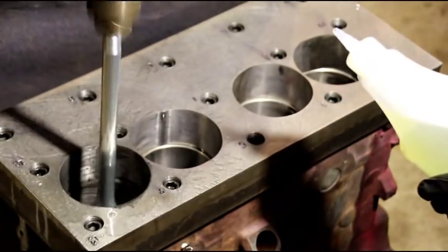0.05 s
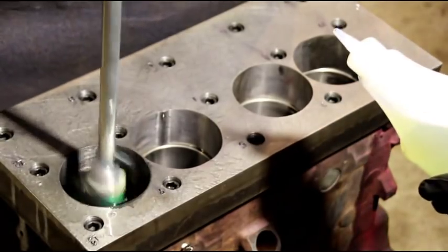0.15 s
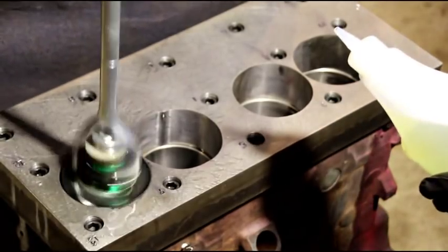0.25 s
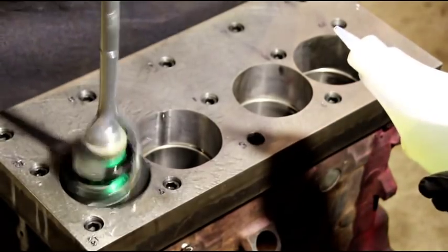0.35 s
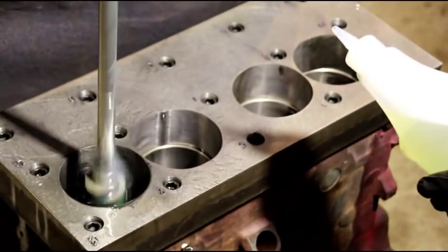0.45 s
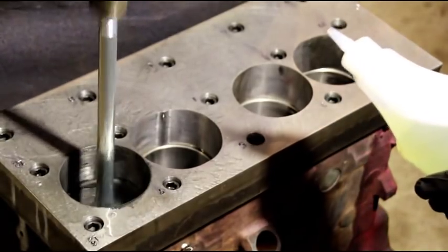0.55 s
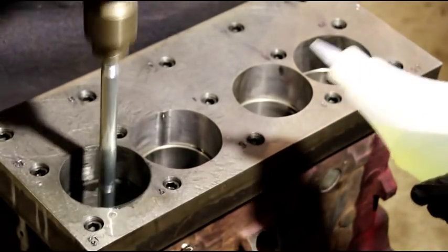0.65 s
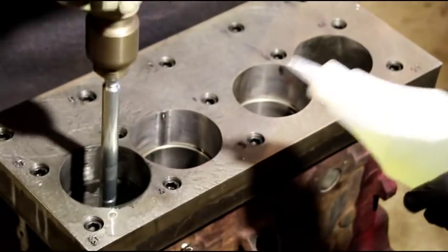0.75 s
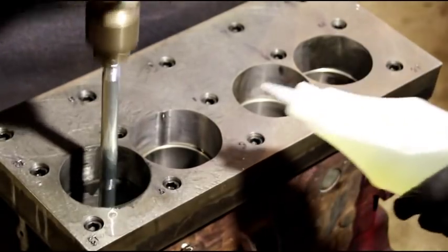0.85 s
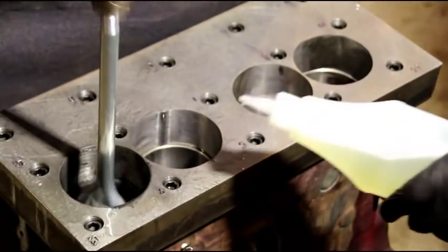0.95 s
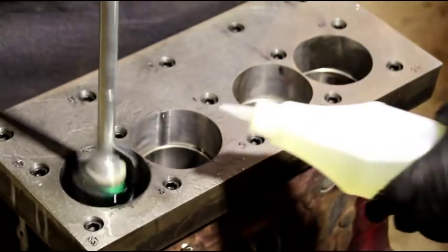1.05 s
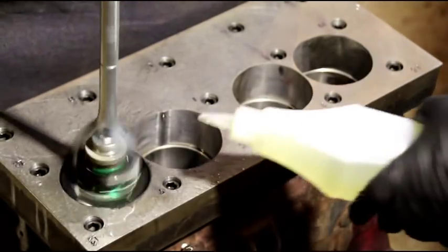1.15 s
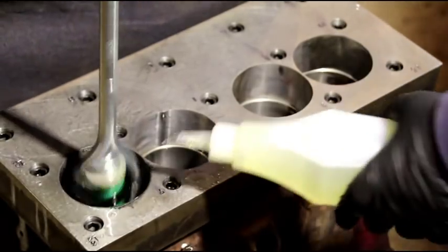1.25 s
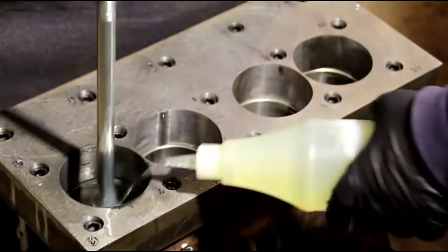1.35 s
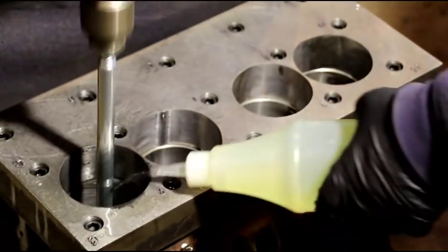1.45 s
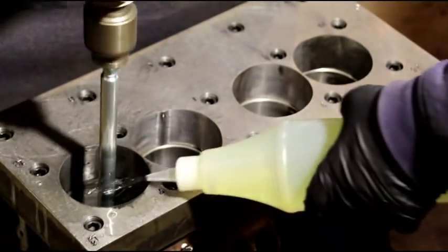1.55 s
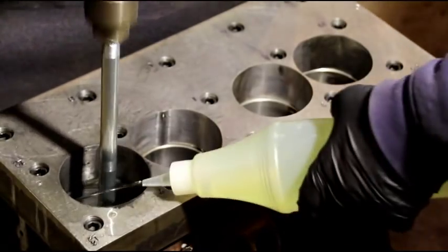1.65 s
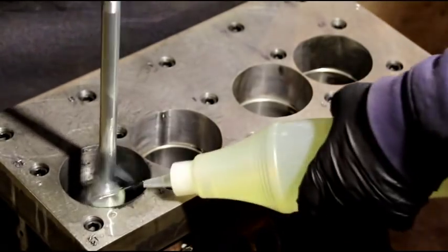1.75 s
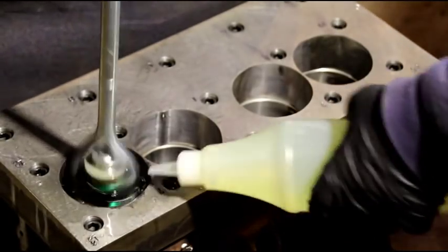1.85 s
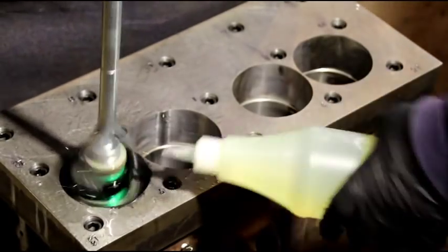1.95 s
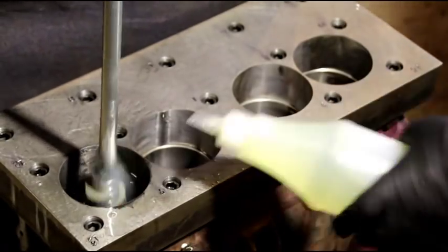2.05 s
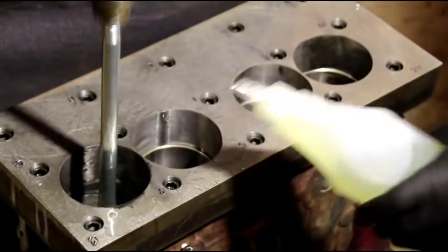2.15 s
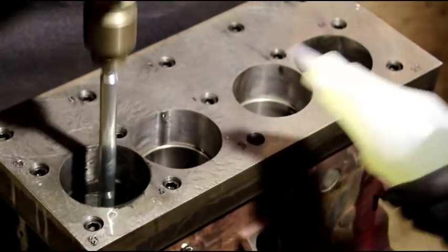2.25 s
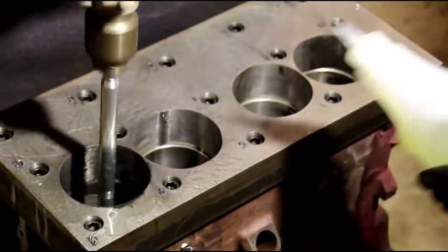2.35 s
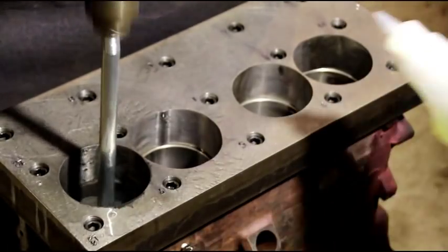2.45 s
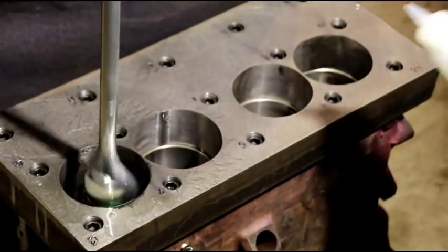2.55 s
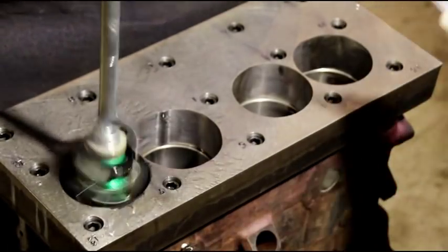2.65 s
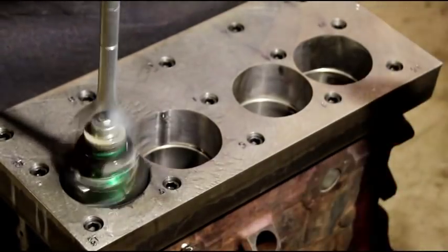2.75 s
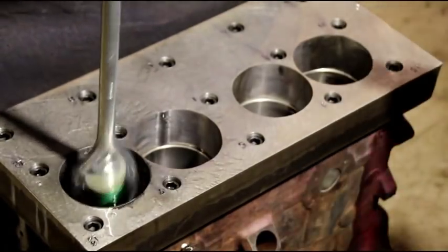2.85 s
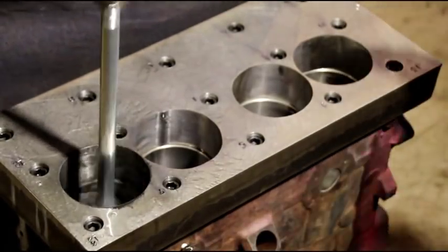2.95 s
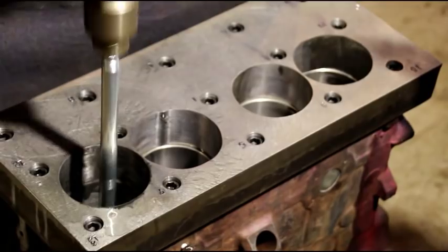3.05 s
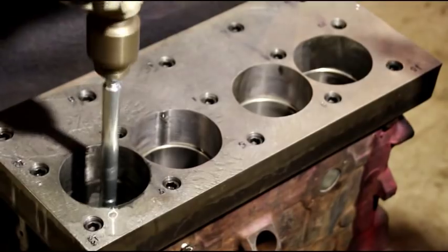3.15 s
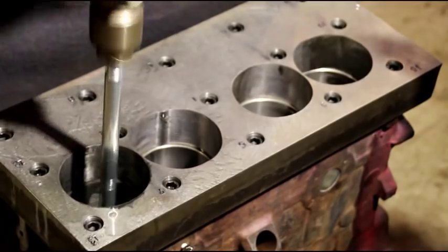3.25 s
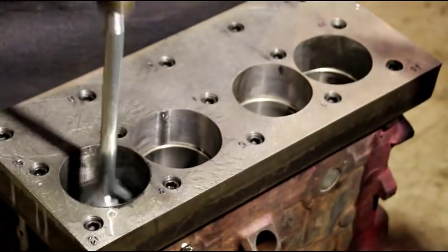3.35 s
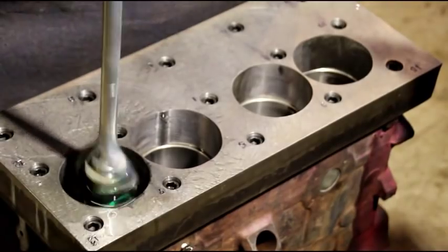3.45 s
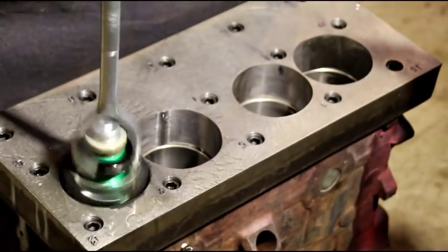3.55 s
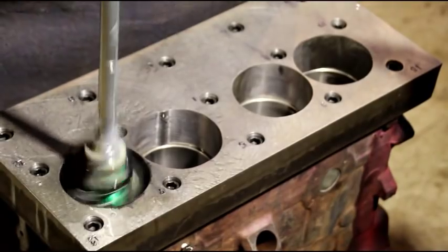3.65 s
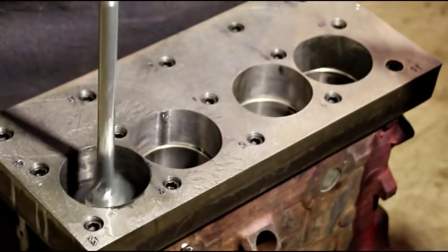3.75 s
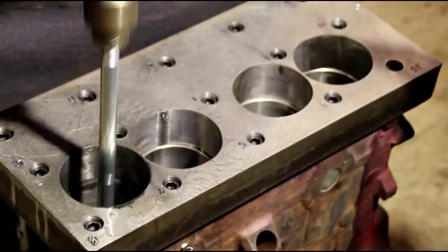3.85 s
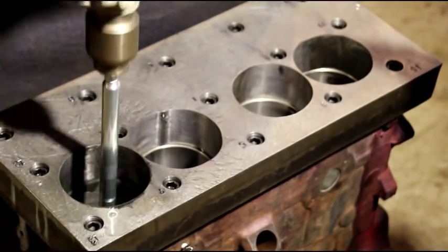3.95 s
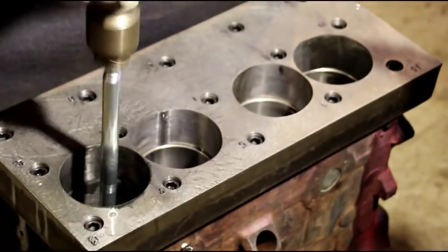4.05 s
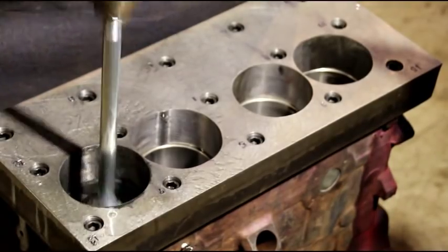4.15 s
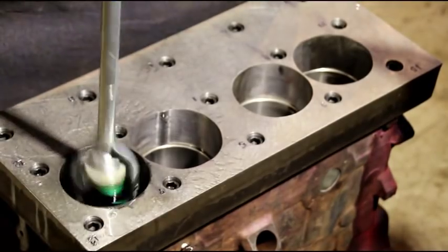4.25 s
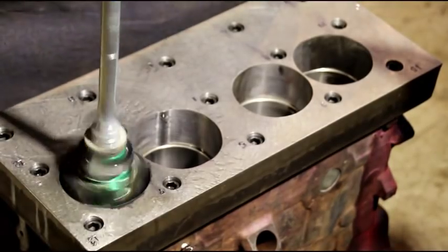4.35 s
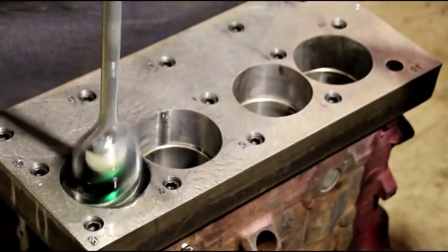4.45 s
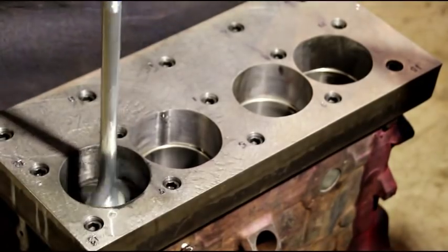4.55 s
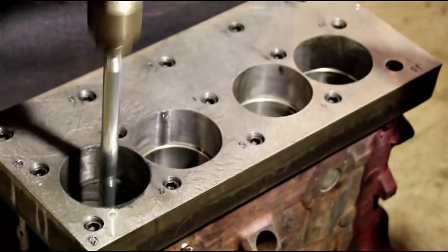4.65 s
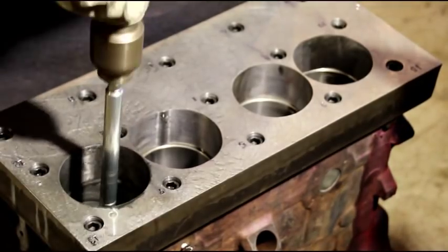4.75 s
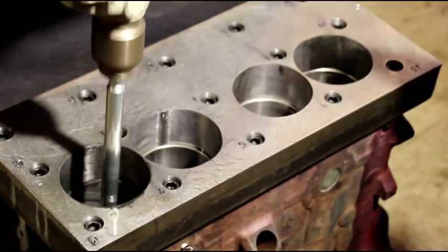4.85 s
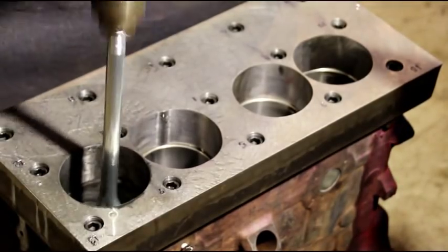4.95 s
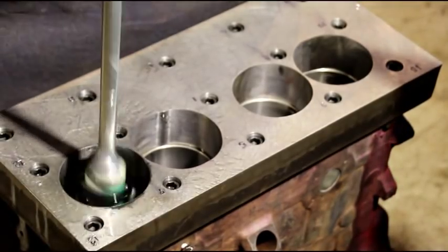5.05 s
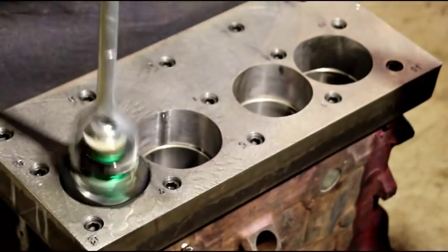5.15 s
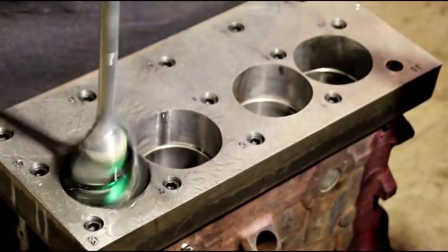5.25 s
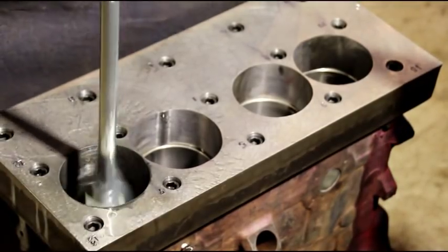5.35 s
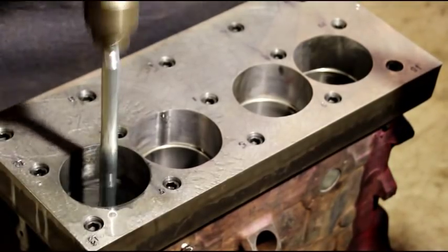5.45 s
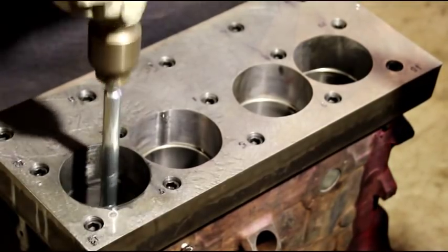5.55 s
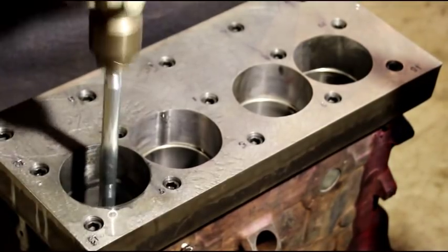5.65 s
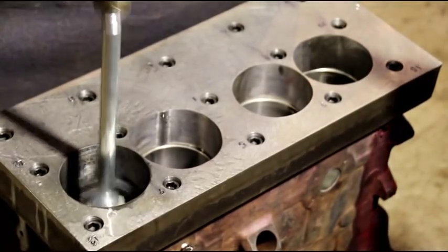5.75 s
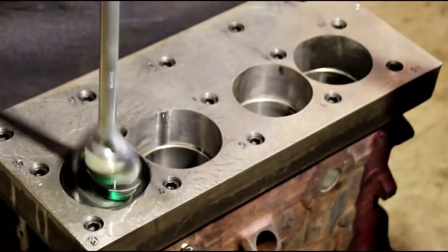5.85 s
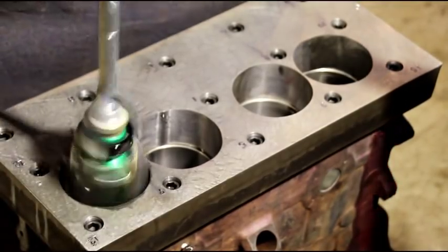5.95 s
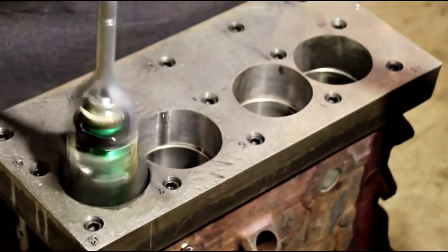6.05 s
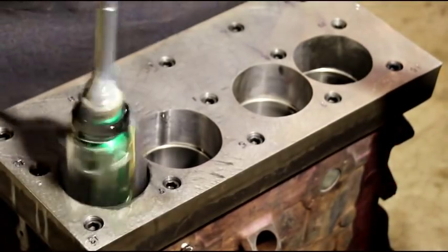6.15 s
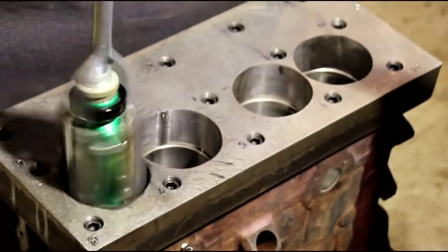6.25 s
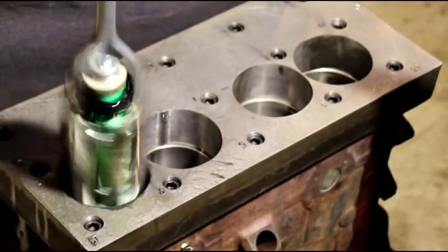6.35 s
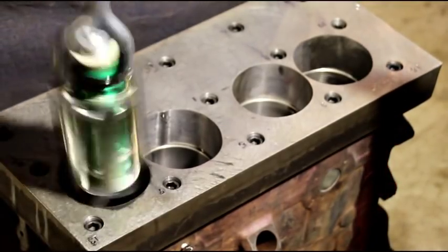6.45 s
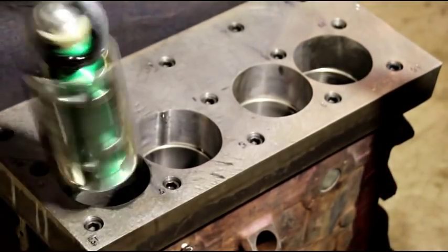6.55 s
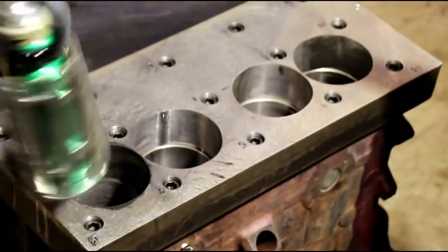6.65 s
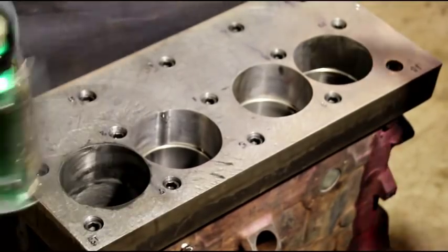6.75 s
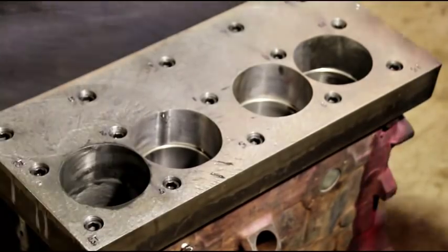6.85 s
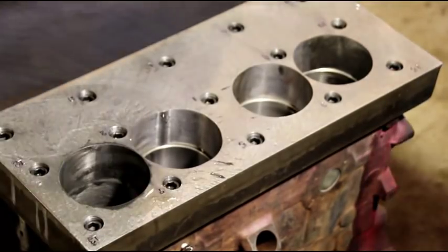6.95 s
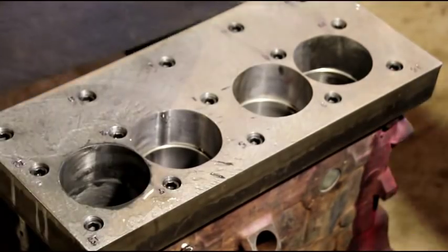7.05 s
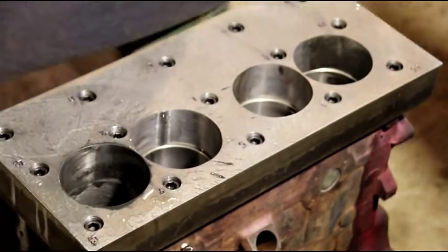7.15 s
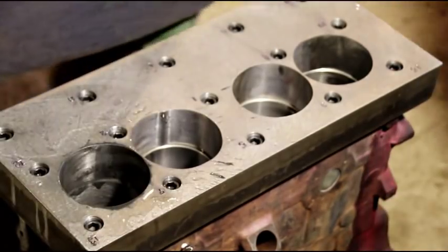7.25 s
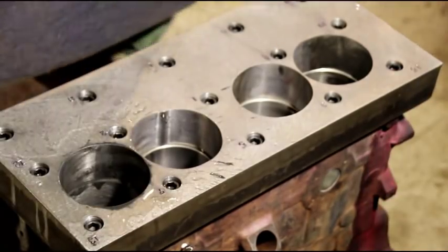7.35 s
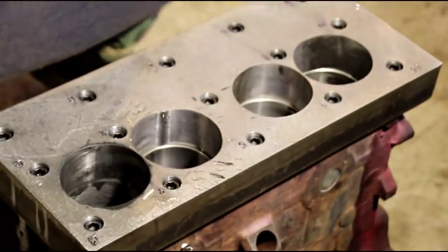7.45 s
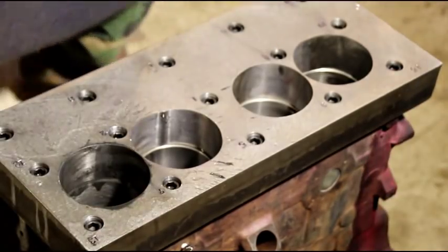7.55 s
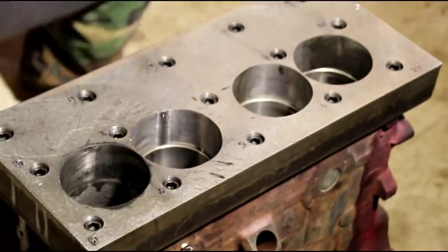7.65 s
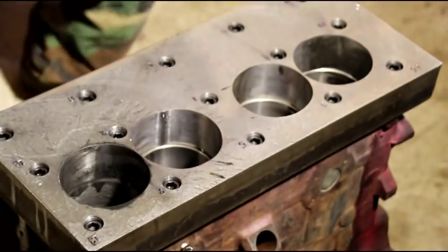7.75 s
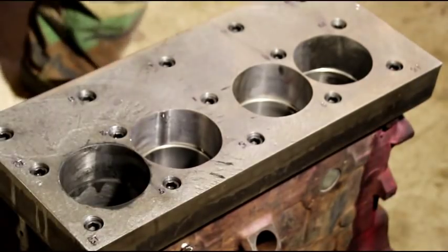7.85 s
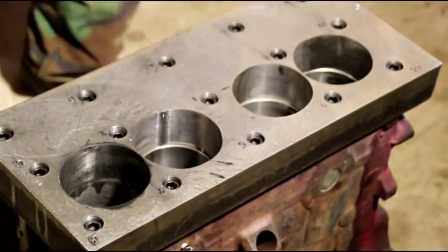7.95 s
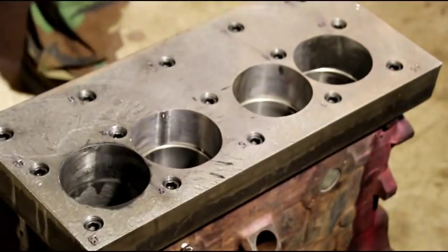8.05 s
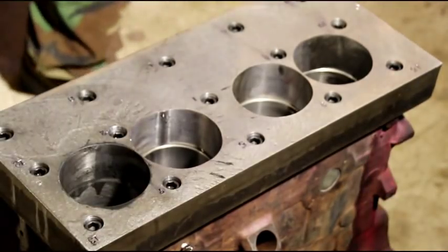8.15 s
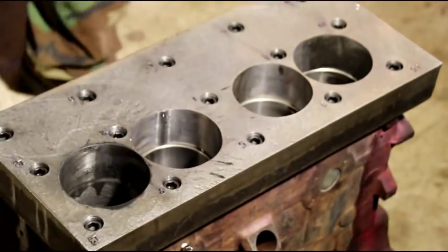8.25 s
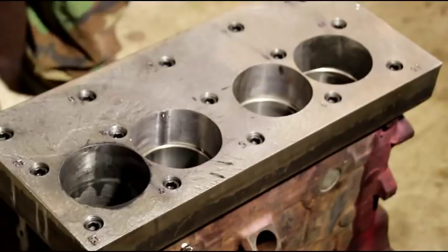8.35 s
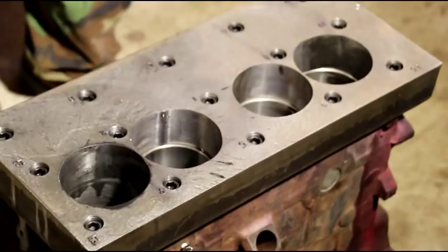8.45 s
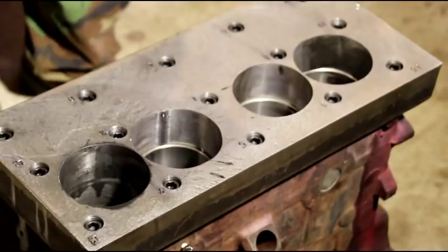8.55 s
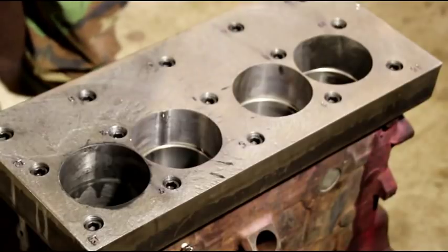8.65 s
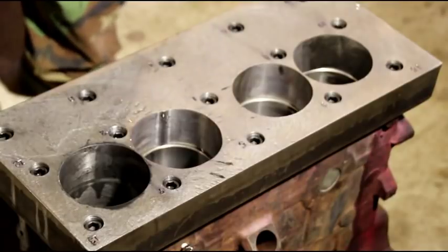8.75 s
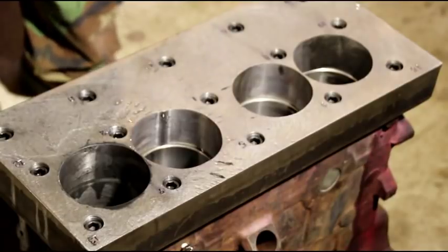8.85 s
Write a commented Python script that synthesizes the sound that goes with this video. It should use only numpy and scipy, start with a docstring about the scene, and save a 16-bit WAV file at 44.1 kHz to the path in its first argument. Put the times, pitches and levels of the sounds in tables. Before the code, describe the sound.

A steady electric drill whine lifts slightly with each stroke over gritty scraping, then slides down to a stop amid metallic rattles and clacks.

```python
"""A steady electric whine rises a little again and again over a gritty rub, then sinks amid rattles and clacks.
An electric drill is spinning a hone up and down in an oiled engine cylinder, close by in a workshop.
Gears and fan make tones that follow the motor's speed; the rub of the stones is noise with resonances.
The trigger is let go and the hone lifted out; its loose parts rattle and clack as the motor coasts to a stop."""
import sys
import numpy as np
from scipy import signal
from scipy.fft import rfft, irfft
from scipy.io import wavfile
from scipy.ndimage import uniform_filter1d

SR = 44100
rng = np.random.default_rng(int(sys.argv[2]) if len(sys.argv) > 2 else 0)


def log_audio(samples):
    """Write samples as a 16-bit WAV file to the path given in sys.argv[1]."""
    # one column per channel
    frames = np.atleast_2d(samples).T
    # limit to full scale, then quantise
    limited = np.clip(frames, -1, 1)
    pcm = np.round(limited * 32767).astype(np.int16)
    wavfile.write(sys.argv[1], SR, pcm)


N = 392049
T = np.arange(N) / SR  # time in seconds
HZ = np.fft.rfftfreq(N, 1 / SR)

# Levels in these tables are relative: mixing gains and filters come later.
# Top of each stroke, where the hone drags least. Each row: time in seconds, speed gained in turns per second.
STROKES = [(0.459, 9.5), (1.31, 5.7), (2.08, 5.1), (2.87, 7.85), (3.73, 7.5), (4.54, 6.7), (5.35, 7.3),
           (6.02, 4.55)]
# Blend from the loaded sound (1) to the coasting sound (0). Each row: time in seconds, share.
LOADED_SHARE = [(0, 1), (6.05, 0.8), (6.7, 0.16)]
# Whine of the small drive gear (pinion). Each row: time in seconds, level in dB.
PINION_LEVEL = [(0, -21.9), (6.0, -22.5), (6.08, -17.5), (6.3, -24.5), (6.65, -27.5), (6.95, -25),
                (7.2, -25), (7.45, -21), (7.66, -30.5), (7.82, -28.5), (7.94, -24), (8.09, -26.5),
                (8.16, -36.5), (8.34, -45)]
# Weaker tones. Each row: multiple of shaft speed, level when loaded in dB, level when coasting in dB.
WEAK_TONES = [(4, -24.5, -33.5), (7.5, -40.5, -41), (8, -44, -52), (9, -64, -25), (10, -39, -49),
              (17, -64, -50), (18, -34, -43), (20.5, -39.5, -43)]
# How well the drill housing radiates the weaker tones. Each row: frequency in Hz, gain in dB.
HOUSING = [(100, -27), (320, -21), (1200, -14), (2000, -21), (2500, 1), (3100, -8), (4200, -7),
           (5500, -10.5), (6700, -0.5), (7600, -13), (9000, -24), (11400, -20.5), (16000, -34)]
# Commutator, pinion overtones and commutator overtone, away from resonances.
# Each row: multiple of shaft speed, level when loaded in dB, level when coasting in dB.
UPPER_TONES = [(22, -51, -47), (24, -37, -41.5), (36, -49, -47), (44, -74, -47)]
# Where each upper tone sings out.
# Each row: multiple of shaft speed, resonance in Hz, half width in Hz, peak level in dB.
SINGING = [(22, 3200, 380, -30), (22, 2430, 160, -27.5), (22, 1900, 80, -28.5), (24, 6500, 330, -32),
           (24, 4550, 320, -35), (24, 2670, 260, -28), (36, 8200, 670, -41.5), (36, 6740, 340, -28),
           (36, 5800, 400, -31.5), (44, 3130, 130, -25.5)]

# Stones on the bore and rushing air. Each row: time in seconds, level in dB.
RUB_LEVEL = [(0, -29.5), (1.0, -28), (6.08, -29), (6.25, -34)]
# Broad colour of the rub. Each row: frequency in Hz, gain in dB.
RUB_COLOUR = [(30, -28), (130, -28), (200, -20), (320, -8.5), (480, -7.5), (700, 0), (1400, 1.5),
              (1750, -1.5), (2700, 1), (3900, -1), (4600, -5.5), (6700, -3), (9800, -7), (15000, -26.5)]
# Resonances of the rub. Each row: frequency in Hz, width in Hz, height in dB.
RUB_MODES = [(597, 19, 5.2), (769, 19, 5.2), (1230, 53, 3.3), (1431, 12, 6.2), (2330, 125, 6),
             (2980, 71, 3), (3880, 260, 3.6)]
# Unloaded gears and brushes. Each row: time in seconds, level in dB.
COAST_LEVEL = [(6.05, -38), (6.45, -26.5), (6.75, -22.5), (7.35, -22), (8.0, -31), (8.3, -31), (8.7, -43.5),
               (8.89, -56)]
# Broad colour of the coasting noise. Each row: frequency in Hz, gain in dB.
COAST_COLOUR = [(30, -42), (100, -27), (200, -15), (320, -8), (520, -1), (1000, 0.5), (1700, -2.5),
                (2900, -1), (4300, -8), (6500, -7), (9500, -16.5), (13000, -22), (15000, -36)]
# Resonances of the coasting noise. Each row: frequency in Hz, width in Hz, height in dB.
COAST_MODES = [(738, 160, 5.8), (1285, 50, 7.5), (2750, 600, 2.9)]

# The hone's arms knock together. Each row: time in seconds, peak level in dB.
CLACKS = [(6.2379, -11.5), (6.261, -6), (6.283, -11), (7.5542, -9), (7.728, -10), (7.7542, -6),
          (7.9759, -6.5), (7.9963, -5.5), (8.0374, -15), (8.093, -11), (8.2724, -7), (8.2991, -2.5),
          (8.319, -6.5), (8.4054, -11.5), (8.4234, -13), (8.6119, -7.5), (8.625, -17)]
# Broad colour of the clacks. Each row: frequency in Hz, gain in dB.
CLACK_COLOUR = [(150, -22), (600, -2), (1200, -12), (2800, 2), (4500, -8), (7500, -2.5), (10000, -10.5),
                (13000, -23), (15500, -34)]
# Resonances of the clacks. Each row: frequency in Hz, width in Hz, height in dB.
CLACK_MODES = [(3050, 67, 1.8), (5920, 61, 2.7), (7870, 210, 4.9)]
# Dull bumps as the spindle stops. Each row: start in seconds, level in dB, time to fall by 60 dB in seconds.
BUMPS = [(8.365, -35, 0.28), (8.40, -34, 0.24), (8.433, -34, 0.14)]
# Colour of the bumps. Each row: frequency in Hz, gain in dB.
BUMP_COLOUR = [(40, -28), (120, -15), (175, -3), (250, -1), (340, -1), (480, -5), (700, -15), (2000, -45)]
# Loose arms and spring of the hone. Each row: time in seconds, level in dB.
RATTLE_LEVEL = [(7.5, -37), (7.75, -25.5), (8.22, -28.5), (8.47, -26.5), (8.57, -32), (8.71, -37.5),
                (8.76, -51), (8.89, -64)]
# The wobbling hone is shaken harder. Each row: time in seconds, level in dB.
SHAKES = [(7.57, -24), (7.77, -29), (8.003, -22), (8.1, -28), (8.151, -26), (8.29, -28), (8.385, -32)]
# Broad colour of the lively rattle. Each row: frequency in Hz, gain in dB.
RATTLE_COLOUR = [(150, -31), (600, -16), (1200, -13), (1650, -5), (1900, 0.5), (3000, 0.5), (4000, -5.5),
                 (4500, -9.5), (6500, -9.5), (10000, -16.5), (15000, -42)]
# Colour of the same parts once nearly still. Each row: frequency in Hz, gain in dB.
SETTLED_COLOUR = [(150, -21), (600, -20), (1300, -7), (1900, 2), (2500, 1), (3100, -12), (4000, -12),
                  (4600, -32), (9000, -22), (15000, -31)]
# Resonances of the loose parts. Each row: frequency in Hz, width in Hz, height in dB.
RATTLE_MODES = [(1910, 154, 5.1), (2210, 130, 4.3), (2550, 59, 6.1), (3000, 140, 4.3), (3370, 55, 1.9),
                (3940, 200, 6)]

# Colour of the workshop air. Each row: frequency in Hz, gain in dB.
AIR_COLOUR = [(30, -21), (120, -2.5), (250, 3), (1100, -1), (3500, 6), (4500, -20), (15000, -24)]
# How long the room rings. Each row: frequency in Hz, time to fall by 60 dB in seconds.
ROOM_DECAY = [(200, 0.23), (2000, 0.5), (6000, 0.26), (14000, 0.26)]
# Difference between the two microphone ports. Each row: frequency in Hz, level in dB.
PORT_DIFFERENCE = [(100, -56), (1400, -99), (2400, -39.5), (4400, -6), (8000, -14), (12000, -2), (15000, 0)]

TEETH, BLADES = 12, 9  # on the pinion and on the cooling fan
STROKE_RISE_S, STROKE_FALL_S, FIRST_STROKE_S, LAST_STROKE_S = 0.145, 0.165, 0.85, 0.52
# Motor shaft under power, in turns per second: it creeps up as the bore gets smoother.
RUN_HZ, EARLY_SAG_HZ, RUN_IN_S = 318.7, 6.4, 2.6
# Coasting: turns per second lost each second to dry friction, speed at which air drag equals it,
# and the time at which these two alone would stop the shaft.
FRICTION_HZ_PER_S, AIR_DRAG_HZ, REST_S = 66.85, 206, 8.987
# The stones brake the shaft too, until the hone leaves the bore.
BORE_HZ_PER_S, LIFT_S = 137, 6.25
# Fan: level before its echo, rise at the bottom of a stroke, and strength of the echo off the block (0-1).
FAN_DB, FAN_NEAR_DB, FAN_ECHO = -29.5, 1, 0.51
SWELLS_PER_STROKE, FAN_SWELL_AT = 3, 0.075  # first swell as a share of a stroke
SHAKE_S = 0.014
CRACK_RING_S, CHATTER_RING_S = 0.012, 0.035  # time to fall by 60 dB
EDGE_HZ = 15400


def amp(db):
    """Turn decibels into a gain."""
    return 10 ** (np.asarray(db) / 20)


def evened(x):
    """Scale to an average strength (rms) of 1."""
    return x / np.sqrt(np.mean(x ** 2) + 1e-20)


def curve(rows):
    """Join (time, value) points with straight lines."""
    return np.interp(T, *np.transpose(rows))


def level(rows, fade=0.16):
    """Gain along a dB curve, dying away outside its span."""
    outside = np.maximum(rows[0][0] - T, 0) + np.maximum(T - rows[-1][0], 0)
    return amp(curve(rows)) * np.exp(-outside / fade)


def read(points, hz):
    """Read a (frequency, value) curve, joined evenly in pitch."""
    f, value = np.transpose(points)
    return np.interp(np.log(hz + 1), np.log(f + 1), value)


def wander(hz):
    """Random motion of rms 1, up to about hz."""
    return evened(irfft(rfft(rng.standard_normal(N)) / (1 + (HZ / hz) ** 2), N))


def waver(hz):
    """Random motion of rms 1, around hz, with no slow drift."""
    shape = HZ / (1 + (HZ / hz) ** 2) ** 2
    return evened(irfft(rfft(rng.standard_normal(N)) * shape, N))


def body(x, colour, modes=()):
    """Causal filter: a broad colour with resonances on top; keeps the power of white noise."""
    hz = np.fft.rfftfreq(4096, 1 / SR)
    db = read(colour, hz)
    for centre, width, height in modes:
        db = db + height / (1 + (2 * (hz - centre) / width) ** 2)
    log_gain = np.log(amp(np.r_[db, db[-2:0:-1]]))
    # Minimum phase: the response starts at once, with no ringing beforehand.
    ring = np.fft.ifft(np.exp(np.conj(signal.hilbert(log_gain)))).real
    return signal.oaconvolve(x, ring / np.linalg.norm(ring))[:N]


def grit(per_s, share):
    """Smooth hiss mixed with tiny separate impacts, which carry the given share of the power."""
    sizes = 2 * rng.random(N) - 1
    ticks = sizes * (rng.random(N) < per_s / SR)
    return np.sqrt(1 - share) * rng.standard_normal(N) + np.sqrt(share) * evened(ticks)


def bursts(rows, rise=0.0016):
    """Envelope of quick starts that die away."""
    out = np.zeros(N)
    for start, db, t60 in rows:
        part = out[round(start * SR):][:SR // 2]  # a view: adding to it fills out
        age = T[:len(part)]
        part += amp(db - 60 * age / t60) * (1 - np.exp(-age / rise))
    return out


def tone(turns, flutter_db, rough, rough_hz):
    """One tone locked to the shaft; uneven contact shakes its strength and timing."""
    shake = 1 + rough * (wander(rough_hz) + 1j * wander(rough_hz))
    wave = (shake * np.exp(2j * np.pi * turns)).real
    return np.sqrt(2) * wave * amp(flutter_db * wander(11))


def shaft_speed():
    """Turns per second: steady with a lift at each stroke's top, then braked by friction and air drag."""
    driven = RUN_HZ - EARLY_SAG_HZ * np.exp(-T / RUN_IN_S)
    for top, gained_hz in STROKES:
        away = np.maximum((top - T) / STROKE_RISE_S, (T - top) / STROKE_FALL_S)
        driven = driven + gained_hz * np.exp(-away ** 1.7)
    angle = np.clip((REST_S - T) * FRICTION_HZ_PER_S / AIR_DRAG_HZ, 0, np.pi / 2)
    free = AIR_DRAG_HZ * np.tan(angle)
    free = free + BORE_HZ_PER_S * np.maximum(LIFT_S - T, 0)
    return uniform_filter1d(np.minimum(driven, free), size=1500)


def fan_level():
    """As the drill rides up and down, the fan's tone and its echo off the block add and cancel in turn."""
    tops = [s for s, _ in STROKES]
    tops = [tops[0] - FIRST_STROKE_S, *tops, tops[-1] + LAST_STROKE_S]
    stroke = 2 * np.pi * np.interp(T, tops, np.arange(len(tops)))
    echo = FAN_ECHO * np.exp(1j * SWELLS_PER_STROKE * (stroke - 2 * np.pi * FAN_SWELL_AT))
    near = amp(-FAN_NEAR_DB * np.cos(stroke))
    # The fan fades after the last stroke.
    steady = level([(0, FAN_DB), (STROKES[-1][0], FAN_DB)], fade=0.35)
    return abs(1 + echo) * near * steady


def whine(speed, turns, loaded):
    """Pinion, fan and weaker shaft tones, which swell as they slide through the housing's resonances."""
    waver_db = loaded * 1.38 * waver(6.5) + (1 - loaded) * 2.6 * waver(18)
    pinion = tone(turns * TEETH, flutter_db=0.22, rough=0.18, rough_hz=120)
    out = level(PINION_LEVEL) * amp(waver_db) * pinion
    out += fan_level() * tone(turns * BLADES, flutter_db=1.35, rough=0.22, rough_hz=60)
    turning = np.clip(speed / 70, 0, 1) ** 2  # fades the weak tones out at low speed
    shake = 1 + 0.37 * (wander(31) + 1j * wander(21))
    for multiple, loaded_db, coasting_db in WEAK_TONES:
        db = loaded * loaded_db + (1 - loaded) * coasting_db + read(HOUSING, multiple * speed)
        own_shake = np.roll(shake, rng.integers(N))
        wave = (own_shake * np.exp(2j * np.pi * multiple * turns)).real
        out += turning * amp(db) * wave * np.sqrt(2)
    return out


def upper_whine(speed, turns, loaded):
    """Commutator bars and overtones of the pinion sing out in turn as they slide through resonances."""
    out = np.zeros(N)
    turning = np.clip(speed / 55, 0, 1) ** 4
    for multiple, loaded_db, coasting_db in UPPER_TONES:
        energy = amp(loaded * loaded_db + (1 - loaded) * coasting_db) ** 2
        for singer, hz, half_width, db in SINGING:
            if singer == multiple:
                nearness = np.exp(-((multiple * speed - hz) / half_width) ** 2)
                energy = energy + amp(db) ** 2 * nearness
        out += np.sqrt(energy) * tone(multiple * turns, flutter_db=1.25, rough=0.37, rough_hz=60)
    return turning * out


def shaft_hum(speed, turns, db=-49.5):
    """Rotor unbalance: one clean tone per turn, fading as the speed drops."""
    strength = amp(db) * (speed / speed.max()) ** 1.66
    return strength * tone(turns, flutter_db=1.7, rough=0.049, rough_hz=18)


def beat_tone(turns, loaded, beat_hz=3902, db=-63):
    """A faint tone at a fixed pitch minus the pinion's: low at full speed, climbing as the motor slows."""
    return amp(db) * loaded * np.sqrt(2) * np.sin(2 * np.pi * (beat_hz * T - TEETH * turns))


def rubbing(turns, gear_ratio=19.5, uneven_db=0.53):
    """Grit drags unevenly over the bore, pressing harder once each turn of the spindle."""
    press_db = 0.12 * np.sin(2 * np.pi * turns / gear_ratio)
    press_db = press_db + 0.34 * wander(100) + uneven_db * waver(9.2)
    drive = grit(per_s=3500, share=0.31) * amp(press_db) * level(RUB_LEVEL, fade=0.27)
    return amp(6.5) * body(drive, RUB_COLOUR, RUB_MODES)


def tooth_errors(turns, count=90, size=4096):
    """Small flaws of the gears repeat every turn: a comb of faint high lines that follows the shaft."""
    multiples = np.arange(count)
    strengths = rng.standard_normal(count) + 1j * rng.standard_normal(count)
    flaws = irfft(strengths * (multiples > TEETH), size)
    return evened(np.interp(turns % 1, np.arange(size) / size, flaws))


def coasting(turns):
    """Slack gears chatter once per motor turn."""
    chatter_db = 0.5 * np.sin(2 * np.pi * turns) + 0.78 * wander(50)
    flaws = amp(-10) * tooth_errors(turns) * curve([(7.7, 0.82), (8.2, 0)])
    drive = grit(per_s=3000, share=0.35) + flaws
    return amp(-0.5) * body(drive * amp(chatter_db) * level(COAST_LEVEL), COAST_COLOUR, COAST_MODES)


def knocks():
    """Each clack is a sharp crack with a short chatter after it; a few dull bumps are added near 8.4 s."""
    crack = bursts([(s, db, CRACK_RING_S) for s, db in CLACKS], rise=0.00057)
    crack = crack * rng.standard_normal(N)
    chatter = bursts([(s, db, CHATTER_RING_S) for s, db in CLACKS])
    chatter = chatter * grit(per_s=1700, share=0.39)
    clacks = body(amp(-5.0) * crack + amp(-10.5) * chatter, CLACK_COLOUR, CLACK_MODES)
    return clacks + body(bursts(BUMPS) * rng.standard_normal(N), BUMP_COLOUR)


def rattling():
    """Out of the bore, the hone's loose steel parts jingle; they sound duller as they settle."""
    shaken = level(RATTLE_LEVEL, fade=0.03)
    for s, db in SHAKES:
        shaken = shaken + amp(db) * np.exp(-((T - s) / SHAKE_S) ** 2)
    drive = grit(per_s=990, share=0.46) * amp(2.0 * wander(100)) * shaken
    settled = curve([(8.4, 0.14), (8.65, 0.96)])
    lively = body(drive * np.sqrt(1 - settled), RATTLE_COLOUR, RATTLE_MODES)
    dull = body(drive * settled, SETTLED_COLOUR, RATTLE_MODES)
    return amp(0.5) * lively + dull


def last_tick(start=8.8, db=-43, t60=0.17):
    """One faint ringing tick as everything comes to rest."""
    colour = [(500, -18), (3000, -23), (3600, -5), (4300, -18), (12000, -31)]
    hiss = bursts([(start, db, t60)]) * rng.standard_normal(N)
    return body(hiss, colour, [(3580, 380, 7.3)])


def uneven_gain(x, patchy_db=2.0):
    """Random uneven gain over time and pitch, mostly in the treble of the noise."""
    hz, _, z = signal.stft(x, SR, nperseg=512)
    patches = uniform_filter1d(rng.standard_normal(z.shape), size=3, axis=0)
    patches = evened(uniform_filter1d(patches, size=3, axis=1))
    depth_db = patchy_db * read([(1500, 0.11), (5000, 1)], hz)[:, None]
    gain_db = depth_db * patches - 0.068 * depth_db ** 2  # the small cut offsets energy the patches add
    return signal.istft(z * amp(gain_db), SR, nperseg=512)[1][:N]


def room(x):
    """Sparse reflections, each band dying at its own speed."""
    taps = rng.choice([-1., 1.], SR) * (rng.random(SR) < 2000 / SR)
    taps = taps * (T[:SR] > 0.004)  # no reflection arrives sooner
    hz, t, z = signal.stft(taps, SR, nperseg=256)
    decay = amp(-60 * t / read(ROOM_DECAY, hz)[:, None])
    tail = signal.istft(z * decay, SR, nperseg=256)[1]
    return signal.fftconvolve(x, tail / np.linalg.norm(tail))[:N]


def ports(mono, diffuse):
    """Diffuse treble reaches the two close microphone ports at the same level but in random phase."""
    hz, _, z = signal.stft(diffuse, SR, nperseg=256)
    # 1j shifts by a quarter cycle, with a random sign in each patch.
    lag = 1j * rng.choice([-1., 1.], z.shape) * amp(read(PORT_DIFFERENCE, hz))[:, None]
    side = amp(1.0) * signal.istft(z * lag, SR, nperseg=256)[1][:N]
    return np.array([mono + side, mono - side])


def scene():
    """One shaft speed drives every tone; friction and knocks spread into the workshop."""
    speed, loaded = shaft_speed(), curve(LOADED_SHARE)
    turns = np.cumsum(speed * (1 + 0.00048 * wander(23))) / SR
    tones = whine(speed, turns, loaded) + upper_whine(speed, turns, loaded)
    hums = shaft_hum(speed, turns) + beat_tone(turns, loaded)
    friction = amp(0.43) * uneven_gain(rubbing(turns) + coasting(turns) + rattling())
    hits = knocks() + last_tick()
    echo = room(amp(-18) * tones + amp(-14.5) * friction + amp(-6.5) * hits)
    air = amp(-52) * body(rng.standard_normal(N), AIR_COLOUR)
    diffuse = friction + hits + echo + air
    return ports(tones + hums + diffuse, diffuse)


def record(dry):
    """The recorder's band limit: a steep low-pass filter at EDGE_HZ."""
    low_pass = signal.firwin(511, EDGE_HZ, window=("kaiser", 9), fs=SR)
    return signal.oaconvolve(dry, low_pass[None], "same")


dry = scene()
out = record(dry)
log_audio(out)
```